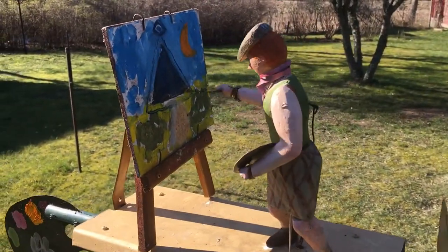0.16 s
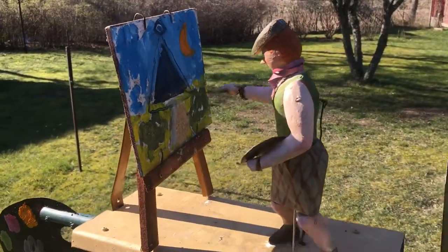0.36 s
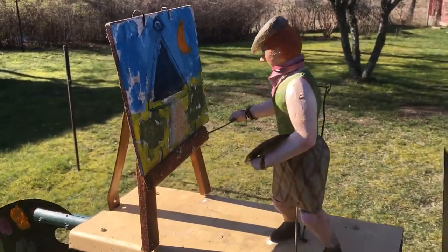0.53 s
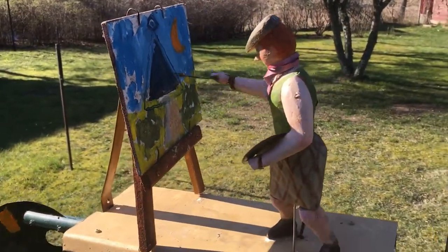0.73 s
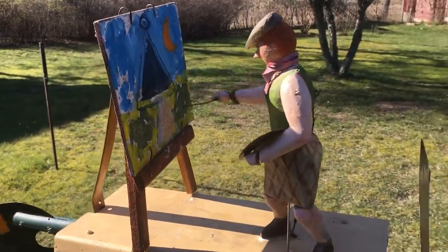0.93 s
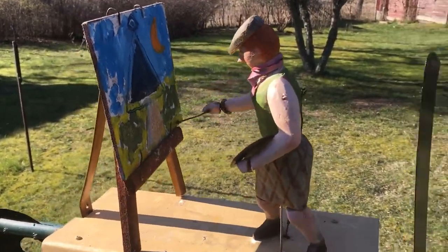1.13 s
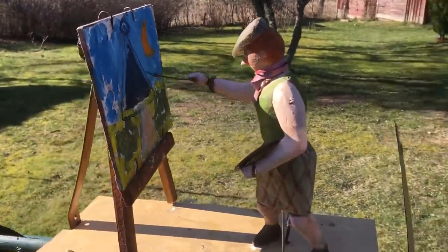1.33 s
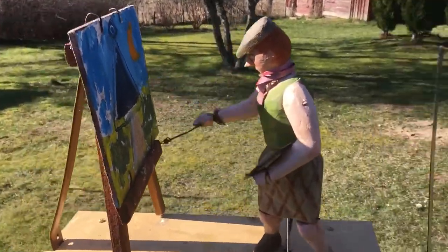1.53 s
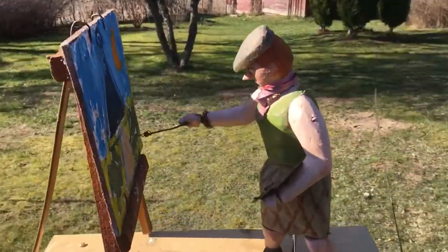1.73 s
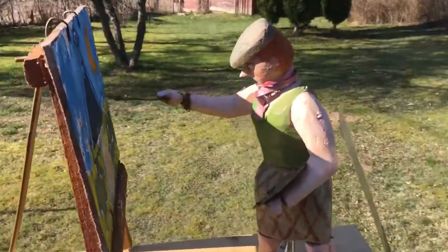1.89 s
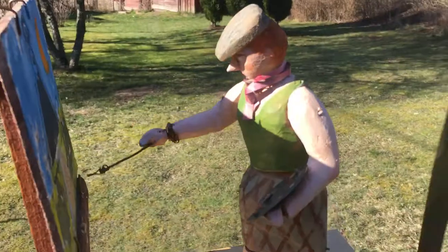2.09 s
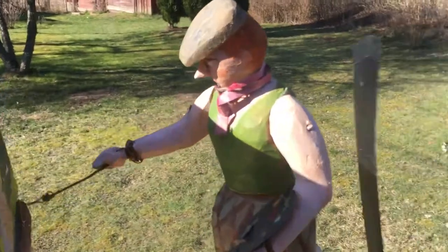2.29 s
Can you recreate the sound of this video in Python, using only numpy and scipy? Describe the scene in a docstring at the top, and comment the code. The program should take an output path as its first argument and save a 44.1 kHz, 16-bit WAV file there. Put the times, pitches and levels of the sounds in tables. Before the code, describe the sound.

Light wooden knocks, brief rubs and tiny shaft squeaks from a turning garden ornament, growing sharper late on; low wind buffets hit the unprotected microphone, while thin bird whistles sound distantly in a quiet garden.

```python
"""A wooden whirligig turns in a garden: once a turn its shaft squeaks (gliding tones) and its arm rubs
(random grains ringing the wood), and the loose linkage ticks and clacks (noise cracks plus ringing wood).
Short gliding tones with echo are mostly thin bird whistles, with a brief blip and a creak's overtone.
Gusts of wind, made of swelling low noise and short pressure spikes, buffet the microphone.
A quiet outdoor hush of coloured noise lies underneath."""
import sys
import numpy as np
from scipy import signal
from scipy.fft import rfft, irfft
from scipy.io import wavfile

SR = 44100
rng = np.random.default_rng(int(sys.argv[2]) if len(sys.argv) > 2 else 0)


def master_out(mix):
    """Clip the mix to full scale and print it as 16-bit PCM to the path in sys.argv[1]."""
    frames = np.transpose(np.atleast_2d(mix))
    ceiling = np.clip(frames, -1, 1)
    pcm = np.round(ceiling * 32767).astype(np.int16)
    wavfile.write(sys.argv[1], SR, pcm)


N = 103635

# squeaks of the dry shaft, once a turn: [centre t/s, level/dB]
SHAFT_SQUEAKS = [(0.126, -59.5), (.657, -51.5), (1.19, -58.5), (1.763, -54), (2.35, -66)]
SQUEAK_HZ, SQUEAK_BEND_HZ, SQUEAK_LENGTH_S = 4762, 50, 0.023
SQUEAK_OVERTONES_DB = (-28, -24)  # second and third harmonic, against the main note
# tiny rising peeps, ahead of most squeaks: [centre t/s, level/dB]
SHAFT_PEEPS = [(.627, -65.5), (1.167, -63), (1.728, -67), (2.335, -68.5)]
PEEP_HZ, PEEP_RISE_HZ_PER_S, PEEP_LENGTH_S = 11400, 13000, 0.013

# rubs of the arm, once a turn: [centre t/s, length t/s, level/dB]
ARM_RUBS = [(0.23, 0.061, -54), (0.745, 0.075, -53.5), (1.304, 0.07, -50.5), (1.865, 0.045, -46)]
RUB_GRAINS_PER_S, RUB_SCATTER_DB, RUB_ECHO_DB = 3500, 2.5, -11.5
RUB_SLOWING_S_PER_OCTAVE, RUB_TOP_HZ = 0.041, 1890  # resonances above the top all peak together
RUB_WIDEN = 2.4  # contact damps and widens the resonances, by this factor
CREAK_S, CREAK_LENGTH_S, CREAK_DB, CREAK_OCTAVE_DB = 1.844, 0.0164, -42, -12
CREAK_HZ, CREAK_HALF_FALL_HZ, CREAK_ROUGHNESS = 1520, 131.2, 0.11  # middle pitch; roughness as a fraction

# resonances of the wooden body: [f/Hz, width f/Hz, struck level/dB, rubbed level/dB]
WOOD_MODES = [(1175, 54, -33, 18.5), (1574, 27, 16, 15.5), (1537, 27, 2.5, 6), (1860, 39, 5, 15.5),
              (2100, 82, -38, -30), (2670, 72, -40, -29.5), (3250, 71, 7, 5.5), (3900, 82, -2.5, -40),
              (4000, 130, -53, -53.5), (4280, 91, -17, -38)]
# knocks of the linkage: [start t/s, level/dB, brightness in dB per octave]
LINKAGE_KNOCKS = [(.002, -51, -1.5), (.08, -49, -6), (0.087, -49, -4), (.208, -61, 13), (.229, -54, -2),
                  (0.252, -51, -6), (0.421, -44.5, -5.5), (0.467, -50, -6), (0.472, -50.5, -2),
                  (.611, -52.5, 5), (.63, -47.5, -2.5), (.718, -44, 0.5), (.738, -56, 13),
                  (0.744, -44.5, 0.5), (0.754, -44, -8.5), (.972, -46, -2.5), (0.981, -49.5, -7),
                  (1.312, -47, 7), (1.5277, -33.5, 5.5), (1.531, -35, 4), (1.5352, -39, -6),
                  (1.54, -39, -14), (1.587, -59.5, 13), (1.814, -53, -5), (1.849, -50, 7), (1.874, -41, -8),
                  (2.1144, -37.5, -1), (2.1149, -34, -4), (2.118, -45, -13), (2.266, -54, 2),
                  (2.28, -48.5, -12)]
# colour of the contact crack: [f/Hz, relative level/dB]
CRACK_COLOUR = [(300, -39), (800, -10.5), (1250, -3.5), (1600, 6.5), (2300, -1), (2850, -9), (3600, 3.5),
                (4500, -6), (5100, -17.5), (6200, -10.5), (9200, -30), (11200, -27.5), (13000, -32),
                (15500, -43)]
KNOCK_TOP_HZ, KNOCK_SPAN_S = 6200, 0.0042  # the ring dulls above the top; level is reckoned over the span
CRACK_DECAY_S, TAIL_DECAY_S, TAIL_DB, RING_DB = 0.0066, 0.027, -16.5, -3  # dB against the crack

# short gliding notes: mostly bird whistles, with a brief 3.2 kHz blip and the creak's falling overtone
# near 2.7 kHz: [start t/s, length t/s, first f/Hz, last f/Hz,
#   curvature (near 0 straight, high settles early), level/dB, echo level/dB against the note]
SHORT_GLIDES = [(.803, .018, 5850, 6380, .5, -65.5, 3.5), (0.834, 0.1, 5030, 4380, 1.8, -74.5, -5),
                (.97, .1, 4230, 4390, 1.05, -77.5, 3.5), (1.12, 0.061, 4090, 4430, 1.2, -75, 6),
                (1.234, 0.092, 7860, 7540, .1, -66, -3.5), (1.287, .016, 3380, 3100, 1, -53, -27),
                (1.29, 0.068, 7530, 6800, 2.05, -72.5, 4), (1.421, 0.067, 5750, 5060, 5.03, -57.5, -2),
                (1.485, 0.11, 5190, 5160, 1.9, -60.5, -22), (1.58, 0.16, 5150, 5165, 1, -80, -6),
                (1.6, 0.083, 4240, 3510, 1.12, -72, 3), (1.722, .013, 7550, 7150, 1, -65, -20),
                (1.73, 0.076, 4130, 4130, 1.1, -69.5, -10), (1.792, 0.048, 3900, 4070, 0.7, -59.5, -14),
                (1.842, .125, 8140, 7650, .5, -67, 0.5), (1.848, 0.03, 4100, 4000, 0.89, -57, -16),
                (1.849, .04, 2690, 2634, 1.3, -57, -19), (1.905, .035, 2150, 2320, 1, -60, -11),
                (1.932, 0.012, 7750, 6860, 0.69, -68, 10), (2.008, .165, 8190, 7290, .3, -67, -2),
                (2.204, 0.067, 8000, 7710, 1.2, -60.5, -3), (2.27, 0.081, 7830, 7400, 0.28, -68, -1),
                (2.3, 0.011, 7600, 7030, 1, -56, 0)]
# quick upward flicks of the birds: [start t/s, level/dB]
BIRD_FLICKS = [(1.829, -63.5), (1.879, -74), (1.972, -82), (1.994, -60.5), (2.162, -65), (2.179, -58.5)]
FLICK_FROM_HZ, FLICK_TO_HZ, FLICK_LENGTH_S, FLICK_ECHO_DB = 4470, 7080, 0.021, 4
GLIDE_EDGE_S, GLIDE_FLUTTER_DB, GLIDE_WAVER = 0.015, 2, 0.006  # waver is a fraction of the pitch
GARDEN_T60_S = 0.59  # time for the echo to fade by 60 dB

# wind buffets: [centre t/s, length t/s, level/dB, upper corner f/Hz]
WIND_GUSTS = [(0.009, 0.04, -34.5, 290), (0.091, 0.036, -30.5, 150), (0.1, 0.019, -23, 152),
              (0.161, 0.046, -21, 410), (.195, 0.026, -22.5, 260), (0.318, 0.021, -30, 152),
              (0.375, 0.035, -29.5, 260), (0.434, 0.031, -32.5, 144), (0.509, 0.04, -32.5, 163),
              (0.644, 0.063, -44.5, 130), (0.759, 0.019, -34, 148), (0.805, 0.039, -39.5, 120),
              (0.863, 0.037, -45, 102), (1.076, 0.12, -50.5, 111), (1.233, 0.089, -43, 99),
              (1.283, 0.047, -38.5, 123), (1.393, 0.033, -24, 275), (1.468, 0.034, -32.5, 222),
              (1.503, 0.036, -25.5, 205), (1.591, 0.039, -35.5, 119), (1.635, 0.024, -29.5, 295),
              (1.698, 0.032, -37, 253), (1.74, 0.042, -35, 151), (1.847, 0.096, -45, 95),
              (2.092, .045, -37, 105)]
WIND_LOW_HZ, WIND_SLOPE, WIND_STEEP = 40.7, 0.84, 3.62  # low cut; base slope and extra fall above corner (powers)
# hardest eddies slapping the microphone port: [t/s, spike level/dB, width t/s]
PORT_SLAPS = [(.164, -3, 0.00054), (0.185, -21.5, 0.00066), (.385, -26, .0012), (1.384, -19, 0.0012),
              (1.404, -24, 0.00082)]
SLAP_RING_HZ, SLAP_RING_S, SLAP_RING = 480, 0.0013, 0.67  # pitch, decay, share against the spike

# colour of the outdoor hush: [f/Hz, relative level/dB per Hz]
HUSH_COLOUR = [(20, -17.5), (50, 0.5), (80, -5.5), (170, -11.5), (450, -15), (780, -19.5), (1200, -20.5),
               (1570, -21.5), (2100, -26.5), (2850, -34), (3600, -31), (5000, -38), (8000, -41),
               (15500, -45.5)]
HUSH_DB, HUSH_WANDER_DB = -53.5, 0.62
TOP_HZ = 15900

T = np.arange(N) / SR
FREQS = np.maximum(np.arange(N // 2 + 1) * SR / N, 1)


def undb(db):
    """Turn decibels into a gain."""
    return 10 ** (np.asarray(db) / 20)


def unit(x):
    """Scale to an average (rms) strength of 1."""
    return x / np.sqrt(np.mean(x ** 2))


def shaped(x, gain):
    """Filter by a gain for each frequency."""
    return irfft(rfft(x) * gain, N)


def colour(points):
    """Turn (Hz, dB) points into a gain for each frequency."""
    hz, db = np.array(points).T
    return undb(np.interp(np.log(FREQS), np.log(hz), db))


def noise(gain):
    """Coloured noise of rms 1."""
    return unit(shaped(rng.standard_normal(N), gain))


def walk(rate):
    """Smooth random wandering with a spread of 1; a higher rate (Hz) wanders faster."""
    return noise(np.exp(-(FREQS / rate) ** 2))


def swell(centre, length):
    """Bell-shaped rise and fall."""
    return np.exp(-2 * ((T - centre) / length) ** 2)


def sized(x, db, length):
    """Give a burst the energy of that level held for that length."""
    return x * undb(db) * np.sqrt(length * SR / (np.sum(x ** 2) + 1e-18))


def tone(hz):
    """Sine of rms 1 on a moving pitch."""
    return np.sqrt(2) * np.sin(2 * np.pi * np.cumsum(hz) / SR)


def resonance(hz, width):
    """Response of one damped mode, a place where the wood likes to vibrate."""
    return 1 / (1 + 1j * (FREQS ** 2 - hz ** 2) / (FREQS * width))


def squeaks():
    """The dry shaft sings a note that sags as it grows loud; tiny peeps rise in pitch."""
    out = 0
    waver = 1 + 0.00406 * walk(120)
    for centre, db in SHAFT_SQUEAKS:
        grip = swell(centre, SQUEAK_LENGTH_S)
        hz = (SQUEAK_HZ + SQUEAK_BEND_HZ * (1 - grip)) * waver
        voice = tone(hz)
        for harmonic, over_db in enumerate(SQUEAK_OVERTONES_DB, 2):
            voice = voice + undb(over_db) * tone(harmonic * hz)
        out = out + undb(db) * grip * voice
    for centre, db in SHAFT_PEEPS:
        hz = PEEP_HZ + PEEP_RISE_HZ_PER_S * np.clip(T - centre, -PEEP_LENGTH_S, PEEP_LENGTH_S)
        out = out + undb(db) * swell(centre, PEEP_LENGTH_S) * tone(hz * (1 + 0.0061 * walk(440)))
    return out


def rubs():
    """Stick-slip grains excite the wood; as the arm slows, weight passes from high resonances to low."""
    out = 0
    for centre, length, db in ARM_RUBS:
        slips = rng.random(N) < RUB_GRAINS_PER_S / SR
        scatter = undb(RUB_SCATTER_DB * rng.standard_normal(N))
        grains = slips * rng.standard_normal(N) * scatter
        scrape = 0
        for hz, width, _, rub_db in WOOD_MODES:
            octaves = np.log2(min(hz, RUB_TOP_HZ) / WOOD_MODES[1][0])
            loudest = centre - RUB_SLOWING_S_PER_OCTAVE * octaves
            mode = resonance(hz, RUB_WIDEN * width) ** 2
            scrape = scrape + undb(rub_db) * unit(shaped(grains * swell(loudest, length), mode))
        out = out + sized(scrape, db, length)
    return out + undb(RUB_ECHO_DB) * garden(out)


def creak():
    """The hardest rub catches and creaks on a rough, falling pitch."""
    fall = CREAK_HALF_FALL_HZ * np.tanh((T - CREAK_S) / CREAK_LENGTH_S)
    hz = (CREAK_HZ - fall) * (1 + CREAK_ROUGHNESS * walk(450))
    voice = tone(hz) + undb(CREAK_OCTAVE_DB) * tone(2 * hz)
    return undb(CREAK_DB) * swell(CREAK_S, CREAK_LENGTH_S) * voice


def body():
    """Ring of the struck wooden parts: a sum of resonances, dulled towards the top."""
    modes = sum(undb(hit_db) * resonance(hz, width) for hz, width, hit_db, _ in WOOD_MODES)
    return modes / (1 + 1j * FREQS / KNOCK_TOP_HZ) ** 2


def knocks():
    """Each contact of the linkage cracks, rings the wood and leaves a short tail."""
    out, wood, crack = 0, body(), colour(CRACK_COLOUR)
    for start, db, bright_db in LINKAGE_KNOCKS:
        age, on = np.maximum(T - start, 0), T >= start
        tilt = undb(bright_db * np.log2(np.clip(FREQS, 800, 12000) / 2500))
        fade = np.exp(-age / CRACK_DECAY_S) + undb(TAIL_DB) * np.exp(-age / TAIL_DECAY_S)
        rasp = noise(crack * tilt) * on * fade
        delay = np.exp(-2j * np.pi * FREQS * round(start * SR) / SR)  # moves the ring to its start
        ring = irfft(wood * tilt * delay, N)
        out = out + sized(unit(rasp) + undb(RING_DB) * unit(ring), db, KNOCK_SPAN_S)
    return out


def short_glides():
    """Gliding tones: mostly bird whistles and flicks, a brief blip and the creak's overtone, with echo."""
    direct, scattered = 0, 0
    waver, flutter = 1 + GLIDE_WAVER * walk(130), undb(GLIDE_FLUTTER_DB * walk(73))
    for start, length, first_hz, last_hz, curve, db, echo_db in SHORT_GLIDES:
        progress = np.clip((T - start) / length, 0, 1)
        glide = np.expm1(-curve * progress) / np.expm1(-curve)
        hz = first_hz + (last_hz - first_hz) * glide
        edge_s = min(GLIDE_EDGE_S, length / 2)
        edge = np.minimum(np.minimum(progress, 1 - progress) * length / edge_s, 1)
        note = undb(db) * np.sin(np.pi / 2 * edge) ** 2 * tone(hz * waver) * flutter
        direct, scattered = direct + note, scattered + undb(echo_db) * note
    for start, db in BIRD_FLICKS:
        progress = np.clip((T - start) / FLICK_LENGTH_S, 0, 1)
        hz = FLICK_FROM_HZ + (FLICK_TO_HZ - FLICK_FROM_HZ) * progress
        note = undb(db) * np.sin(np.pi * progress) * tone(hz * waver) * flutter
        direct, scattered = direct + note, scattered + undb(FLICK_ECHO_DB) * note
    return direct + garden(scattered)


def garden(x):
    """Diffuse echo from trees and fences: fading noise with a soft start."""
    echo = rng.standard_normal(N) * np.exp(-np.log(1000) * T / GARDEN_T60_S) * np.minimum(T / 0.016, 1)
    return signal.fftconvolve(x, echo / np.sqrt(np.sum(echo ** 2)))[:N]


def low_cut():
    """The microphone's steep bass roll-off."""
    return 1 / np.sqrt(1 + (WIND_LOW_HZ / FREQS) ** 12)


def buffet(centre, length):
    """Rise and fall of a buffet, with a broad top and quick edges."""
    return np.exp(-2 * np.abs((T - centre) / length) ** 3)


def wind():
    """Each buffet is a swell of turbulence; faster eddies reach higher."""
    out = 0
    for centre, length, db, corner_hz in WIND_GUSTS:
        fall = FREQS ** -WIND_SLOPE / np.hypot(1, (FREQS / corner_hz) ** WIND_STEEP)
        eddies = noise(low_cut() * fall)
        gust = shaped(eddies * buffet(centre, length), low_cut())
        out = out + sized(gust, db, length)
    return out


def slaps():
    """Each slap on the microphone port is a rounded pressure spike with a brief ring."""
    out = 0
    for start, db, width in PORT_SLAPS:
        age = np.maximum(T - start, 0)
        onset = 1 - np.exp(-(age / width) ** 2)
        ring = onset * np.exp(-age / SLAP_RING_S) * np.cos(2 * np.pi * SLAP_RING_HZ * age)
        out = out + undb(db) * (swell(start, width) + SLAP_RING * ring)
    return shaped(out, low_cut())


def hush():
    """Distant air and foliage: coloured noise wandering slightly in level."""
    return noise(colour(HUSH_COLOUR)) * undb(HUSH_DB + HUSH_WANDER_DB * walk(30))


def scene():
    """Whirligig, short gliding notes, wind and hush at one microphone."""
    whirligig = squeaks() + rubs() + creak() + knocks()
    return (whirligig + short_glides() + wind() + slaps() + hush())[None]


def record(dry):
    """The recorder steeply cuts the highest treble."""
    return signal.sosfilt(signal.ellip(10, 0.1, 80, TOP_HZ, fs=SR, output="sos"), dry)


dry = scene()
out = record(dry)
master_out(out)
```